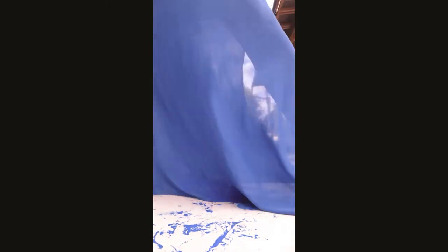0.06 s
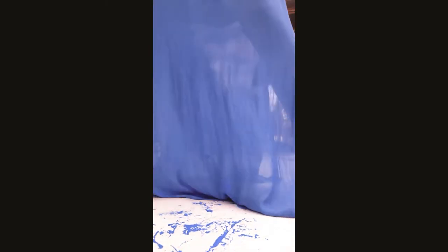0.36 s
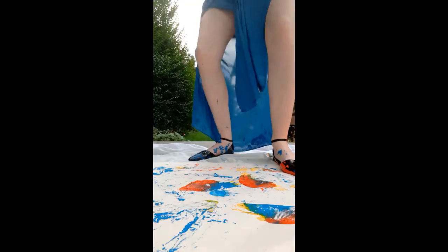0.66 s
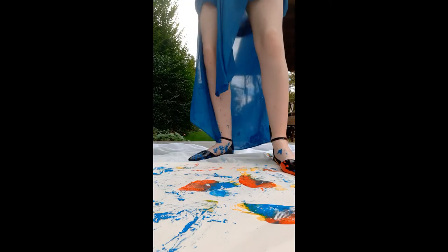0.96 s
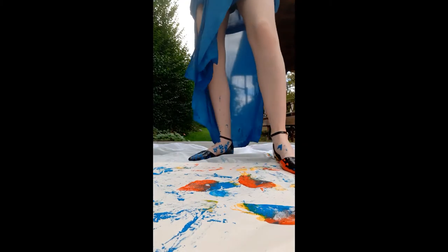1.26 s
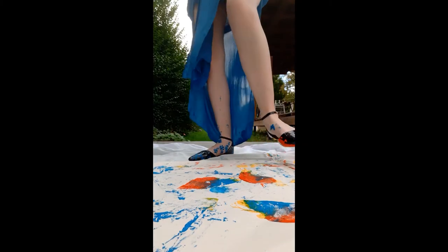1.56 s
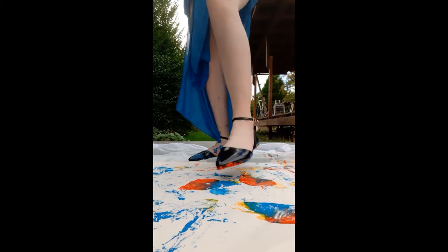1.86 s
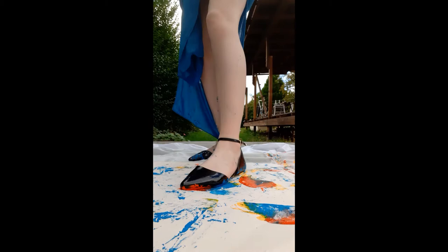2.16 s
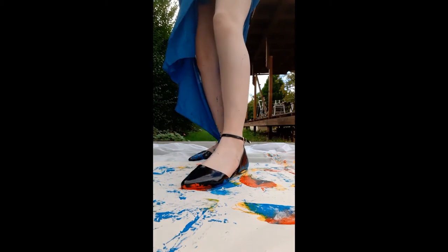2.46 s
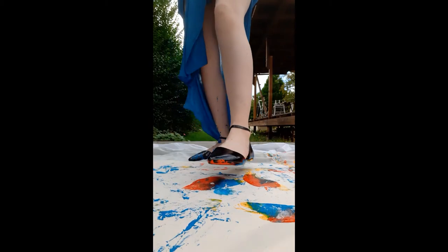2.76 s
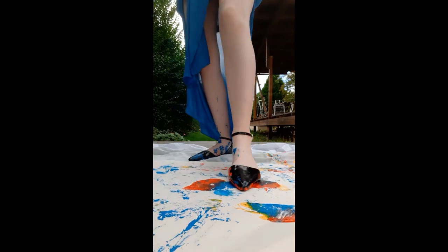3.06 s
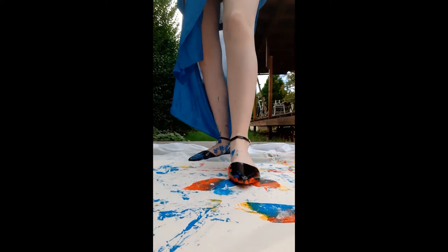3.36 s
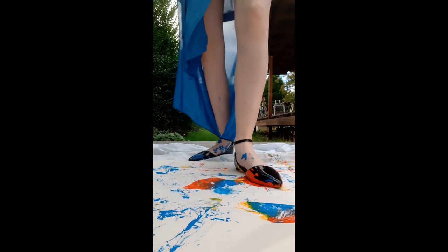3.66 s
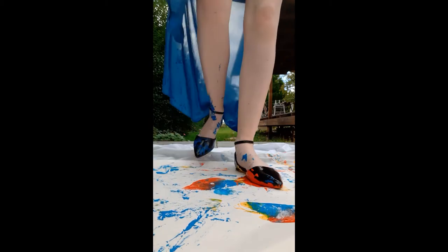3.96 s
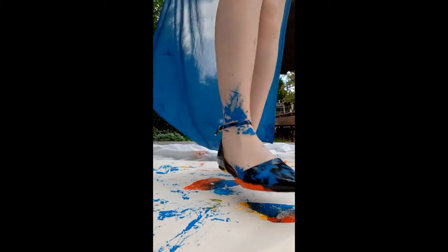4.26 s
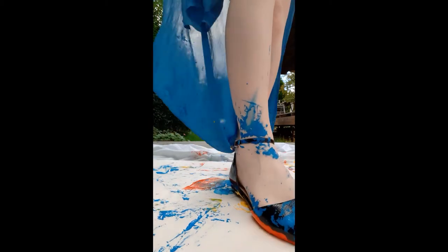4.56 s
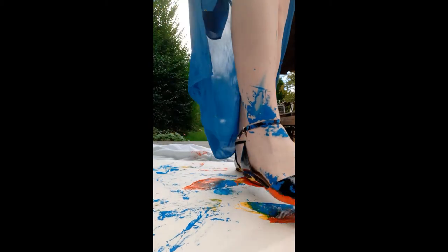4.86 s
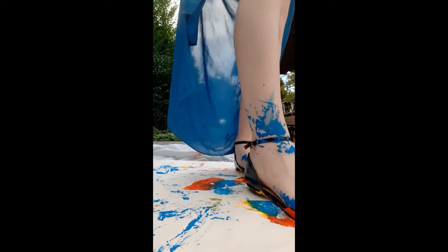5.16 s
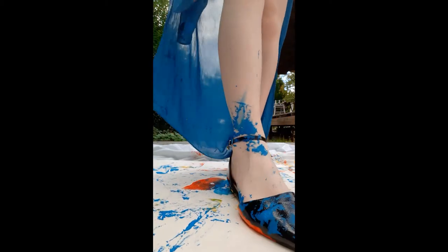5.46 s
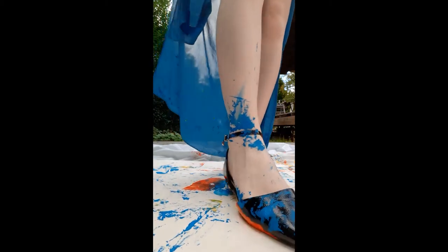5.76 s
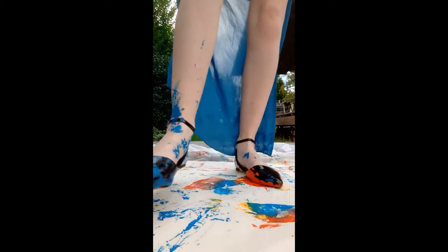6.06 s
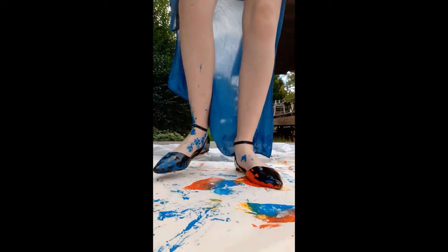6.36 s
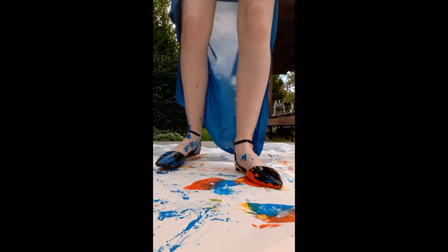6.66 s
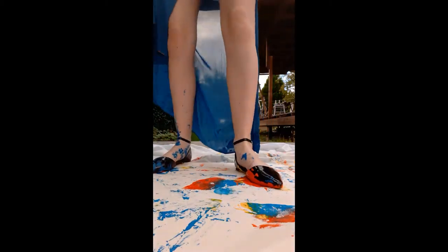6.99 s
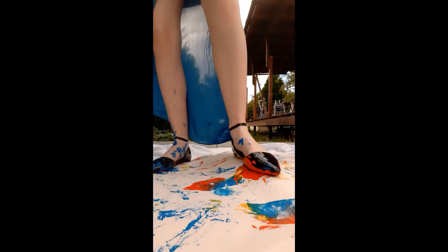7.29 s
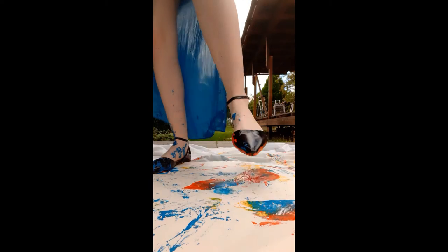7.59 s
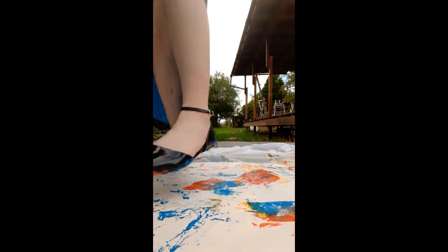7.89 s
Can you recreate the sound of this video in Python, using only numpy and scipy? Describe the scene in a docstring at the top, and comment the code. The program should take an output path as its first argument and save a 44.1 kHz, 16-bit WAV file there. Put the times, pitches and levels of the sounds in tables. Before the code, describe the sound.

A long skirt swishes softly, then hard-soled shoes step unevenly on a big sheet of paper laid on the ground in a garden. Heels and toes knock, the paper crunches and rustles, and shifting weight gives low bumps. The steps grow louder past the middle, with sharp heel clacks and a sticky peel of wet paint, ease off, then return in a last cluster. The microphone is close, with faint traffic far behind.

```python
"""A garden by a wooden porch: hard-soled shoes step through wet paint on a big paper sheet, close by.
Heels and toes knock and ring, soles crush the paper and peel off it, paint pops and creases snap.
The sheet and a long skirt rustle by friction; weight on the ground gives deep bumps.
The porch echoes faintly. Far traffic rumbles underneath, with a few thin, distant whistles."""
import sys
import numpy as np
from scipy import signal
from scipy.fft import rfft, irfft
from scipy.io import wavfile
from scipy.ndimage import uniform_filter1d, map_coordinates

SR = 44100
rng = np.random.default_rng(int(sys.argv[2]) if len(sys.argv) > 2 else 0)


def wav_record(signal):
    """Record a signal, one row per channel, as 16-bit PCM in the file named by sys.argv[1]."""
    frames = np.transpose(np.atleast_2d(signal))
    bounded = np.clip(frames, -1, 1)
    # unit amplitude maps onto the largest positive 16-bit level
    quanta = np.round(bounded * 32767).astype(np.int16)
    wavfile.write(sys.argv[1], SR, quanta)


N = 354123
TIME_S = np.arange(N) / SR

# microphone hiss spectrum: f/Hz, relative density/dB
MIC_SPECTRUM = [(2000, 3), (5000, 1), (8500, -9), (12000, 2), (16000, -4)]
# traffic spectrum: f/Hz, relative density/dB
TRAFFIC_SPECTRUM = [(20, -32), (39, -16.5), (62, -12), (85, -2.5), (102, -2.5), (150, -5.5), (210, -9),
                    (295, -8.5), (420, -17), (580, -22), (800, -20.5), (1400, -26), (2200, -36.5),
                    (3500, -55), (8000, -63.5)]
# traffic envelope: t/s, gain/dB
TRAFFIC_GAIN = [(0, -55), (.58, -55), (.605, -48.5), (1.2, -46), (3.4, -48), (5.9, -48.5), (6.6, -50),
                (8.03, -49)]
# distant whistles: t/s, length/s, f/Hz, bandwidth/Hz, level/dB
FAR_WHISTLES = [(4.31, 0.11, 7000, 1100, -67), (4.349, 0.065, 4970, 1200, -63),
                (4.47, 0.086, 7400, 700, -73), (4.478, 0.14, 6350, 600, -74), (6.1, 0.98, 1467, 90, -72),
                (7.52, 0.25, 2680, 205.6, -76)]
# coarse friction spectrum: f/Hz, relative density/dB
RASP_SPECTRUM = [(200, -8), (700, 7.5), (1600, 4), (2800, 3.5), (4500, 1.5), (7000, 0), (10000, -29),
                 (16000, -38.5)]
# fine friction spectrum: f/Hz, relative density/dB
HISS_SPECTRUM = [(3000, -5.5), (6000, -9), (8500, -5), (12000, -2), (16000, -4)]
# foot dragging the paper: t/s, rise/s, t60/s, rasp/dB, hiss/dB
DRAGS = [(1.267, 0.033, 0.3, -55, -59), (1.361, 0.087, 0.49, -51.5, -53), (2.482, 0.074, .21, -40, -42),
         (3.15, 0.025, 0.44, -61, -65), (3.41, 0.063, .7, -69, -63), (3.535, 0.019, 0.56, -55.5, -68),
         (3.63, 0.035, 1.6, -64, -70), (4.705, 0.053, 0.22, -59, -55), (5.265, 0.06, 0.17, -51.5, -53),
         (5.765, 0.052, 0.11, -49.5, -44.5), (5.92, .05, 0.23, -67.5, -90), (6.1, .013, 0.38, -69.5, -88),
         (6.48, .052, .79, -84, -71), (6.838, 0.013, 0.35, -58.5, -63), (7.089, .13, 0.55, -57, -61),
         (7.24, 0.18, .42, -51, -48.5)]
# loudest creases snapping: t/s, level/dB
CREASE_SNAPS = [(1.267, -45.5), (1.285, -43.5), (1.404, -41), (1.462, -39), (2.5648, -33), (2.587, -33.5),
                (2.6, -31.5), (2.634, -41), (3.0745, -33), (3.403, -44), (3.414, -46), (3.49, -55),
                (3.675, -53), (4.405, -39), (4.7832, -43), (7.154, -52), (7.178, -49)]
# weight shifting onto a foot: t/s, rise/s, t60/s, level/dB
WEIGHT_SHIFTS = [(1.961, 0.087, 0.65, -27.5), (2.18, 0.013, 0.18, -33.5), (2.96, 0.044, 0.22, -35),
                 (3.78, 0.02, 0.46, -39.5)]
# tacky sole peeling: t/s, length/s, start f/Hz, end f/Hz, level/dB
SOLE_PEELS = [(5.0452, 0.00563, 4480, 950, -21), (7.369, .014, 2726, 890, -21.5)]
# wet paint popping under a sole: t/s, length/s, level/dB
PAINT_PATCHES = [(1.4, .14, -41), (6.87, .035, -48.5), (7.183, 0.035, -39.5), (7.306, .037, -38)]
# shoe resonances on the covered ground: f/Hz, bandwidth/Hz, gain/dB
SHOE_MODES = [(665, 470, 2), (1264, 87, -17), (1610, 150, -12), (1890, 110, -9), (2490, 280, -10),
              (2760, 180, -18)]
# sole pressing or leaving the paper: t/s, rise/s, t60/s, thud/dB, crunch/dB, rasp/dB
SOLE_PRESSES = [(1.378, 0.018, 0.64, -40.5, -43.5, -51.5), (2.0, 0.067, 0.16, -37, -51.5, -62.5),
                (2.057, 0.0091, .7, -39, -49.5, -59.5), (2.495, 0.054, 0.32, -38.5, -50, -46.5),
                (3.068, 0.0025, 0.15, -30, -44, -55.5), (3.927, 0.02, 0.17, -46, -46.5, -45),
                (4.406, 0.023, 0.1, -25, -26, -34), (4.801, 0.019, 0.1, -33, -33, -60),
                (5.034, 0.026, .07, -23.5, -28, -34), (5.07, .013, 0.092, -34.5, -29.5, -43),
                (5.4529, 0.0027, 0.074, -32, -22.5, -40.5), (5.459, 0.011, 0.071, -25.5, -22, -29.5),
                (5.625, 0.02, 0.3, -43, -47, -63), (5.81, .042, .13, -35.5, -39, -65),
                (6.875, .012, 0.19, -45, -54, -65), (7.275, 0.041, 0.28, -40.5, -41.5, -60),
                (7.362, 0.0097, .13, -33.5, -26.5, -38), (7.39, 0.019, 0.18, -37, -35.5, -58)]
# thud, crunch, rasp and hiss bands of a press: low f/Hz, high f/Hz
SOLE_BANDS = [(125, 378), (480, 2200), (2400, 5960), (7000, 16400)]
# heel tip resonances: f/Hz, t60/s, relative level/dB
HEEL_MODES = [(1373, 0.024, -1), (2313, 0.044, 2), (2450, 0.026, -18), (3560, 0.012, 5), (4070, 0.014, -1)]
# heel tip strikes: t/s, level/dB
HEEL_STRIKES = [(2.059, -55), (3.0742, -61), (3.9313, -32.5), (4.795, -27.5), (5.046, -29), (5.778, -57),
                (7.3648, -29)]
# shoe knocks: t/s, level/dB, f/Hz, bright edge re level/dB
KNOCKS = [(1.282, -42.5, 1440, -6.5), (1.373, -39.5, 790, -30), (1.402, -31, 1200, -5.5),
          (1.461, -33.5, 810, -5), (1.592, -43.5, 930, -30), (2.058, -29, 1010, -17.5),
          (2.6343, -35, 1450, -8), (3.074, -28.5, 726, -27), (3.93, -29, 1730, -2), (4.429, -31, 1300, 1),
          (4.435, -30, 1100, -24), (4.76, -30.5, 950, -23), (4.795, -21.5, 1950, -50),
          (5.06, -12, 660, -46), (5.066, -26.5, 800, -23), (5.343, -41, 910, -32), (5.453, -30, 1360, -20),
          (5.468, -23.5, 1060, -33), (5.638, -40, 1340, -44), (5.777, -31.5, 1200, -28),
          (5.8377, -29.5, 1060, -25), (5.849, -34, 1010, -32), (5.885, -35.5, 1280, -30),
          (6.229, -48.5, 855, -32), (6.841, -47.5, 1250, -14), (7.178, -40, 1910, -22),
          (7.291, -33, 1450, -15), (7.3646, -23.5, 2600, -37), (7.4061, -26.5, 825, -22),
          (7.441, -37.5, 1620, -24), (7.998, -41.5, 940, -36)]
# feet's bearing to the right: t/s, left channel lag/samples
LEFT_LAG = [(1.4, 3), (4.6, 4), (5.5, 6), (6.8, 2.3)]
# brief dip in overall level: t/s, gain/dB
LEVEL_DIP = [(.555, 1.5), (.575, -18), (.592, -29), (.606, 0)]


def undb(db):
    """Decibels to gain."""
    return 10 ** (np.asarray(db) / 20)


def unit(x):
    """Scale to rms 1."""
    return x / np.sqrt(np.mean(x ** 2))


def unit_hit(x):
    """Scale to the energy of 5 ms at rms 1."""
    return x * np.sqrt(.005 * SR / np.sum(x ** 2))


def curve(points):
    """Interpolate (t/s, value) rows over the scene."""
    return np.interp(TIME_S, *np.transpose(points))


def fade(t, t60_s):
    """Exponential decay."""
    return np.exp(-np.log(1000) * t / t60_s)


def swell(t, rise_s, t60_s, start_db):
    """Rise from start_db to full level, then decay."""
    attack = undb(start_db * np.maximum(1 - t / rise_s, 0))
    return attack * fade(np.maximum(t - rise_s, 0), t60_s)


def band(x, lo_hz, hi_hz, order=2):
    """Causal band-pass."""
    return signal.sosfilt(signal.butter(order, [lo_hz, hi_hz], "band", fs=SR, output="sos"), x)


def colour(x, spectrum):
    """Shape by (f/Hz, gain/dB) rows, then scale to rms 1."""
    hz, db = np.transpose(spectrum)
    bins_hz = np.maximum(np.fft.rfftfreq(N, 1 / SR), 1)
    return unit(irfft(rfft(x) * undb(np.interp(np.log(bins_hz), np.log(hz), db)), N))


def grains(n, spread_db):
    """Dense micro-clicks, resized every 16 samples."""
    sizes = np.repeat(undb(spread_db * rng.standard_normal(n // 16 + 1)), 16)[:n]
    return unit(rng.standard_normal(n) * sizes)


def wander(rate_hz):
    """Smooth random drift, rms 1."""
    hold = int(SR / rate_hz)
    steps = np.repeat(rng.standard_normal(N // hold + 1), hold)
    return unit(uniform_filter1d(uniform_filter1d(steps, hold), hold)[:N])


def wide(mid, side, width):
    """Mid and side to stereo."""
    return (mid + width * side * np.array([[1], [-1]])) / np.sqrt(1 + width ** 2)


def pan(x, pan_db):
    """Set left re right level."""
    return x * undb([[pan_db / 2], [-pan_db / 2]])


def add(out, at_s, x, pan_db=0):
    """Mix x in at at_s."""
    i = int(at_s * SR)
    out[:, i:i + x.shape[-1]] += pan(x, pan_db)[:, :N - i]


def mic_hiss(level_db=-78):
    """Each microphone port adds its own hiss."""
    return undb(level_db) * np.array([colour(rng.standard_normal(N), MIC_SPECTRUM) for _ in range(2)])


def traffic(drone_hz=101, drone_db=-12):
    """Far traffic: a dull, restless rumble with a narrow drone."""
    mid, side = (colour(rng.standard_normal(N), TRAFFIC_SPECTRUM) * undb(wander(14)) for _ in range(2))
    drone = undb(drone_db) * unit(band(rng.standard_normal(N), drone_hz - 9, drone_hz + 9))
    return undb(curve(TRAFFIC_GAIN)) * pan(wide(mid + drone, side, width=.25), pan_db=-2.06)


def whistles():
    """Narrow, airy tones come and go."""
    out = np.zeros((2, N))
    for at_s, length_s, hz, width_hz, db in FAR_WHISTLES:
        n = int(length_s * SR)
        tone = band(rng.standard_normal((2, n)), hz - width_hz / 2, hz + width_hz / 2)
        add(out, at_s, undb(db) * unit(np.hanning(n) * tone))
    return out


def porch(x, build_s=.0032, main_t60_s=.25, bass_t60_s=.18):
    """Scattered reflections off porch and trees."""
    t = np.arange(int(.7 * SR)) / SR
    scatter = rng.standard_normal((2, len(t))) * (1 - np.exp(-t / build_s))
    decay = fade(t, main_t60_s)
    main = undb(-15.5) * band(scatter, 350, 6000, order=1) * decay
    bass = undb(-18) * band(scatter, 60, 540) * fade(t, bass_t60_s)
    return 1.22 * signal.fftconvolve(x, (main + bass) / np.linalg.norm(decay), axes=1)[:, :N]


def friction(rasp_gain, hiss_gain, spread_db, flutter_db):
    """Surfaces catch and let go: coarse rasp under bright hiss."""
    layers = []
    for spectrum in (RASP_SPECTRUM, HISS_SPECTRUM):
        mid, side = (colour(grains(N, spread_db), spectrum) for _ in range(2))
        layers.append(wide(mid, side, width=.93))
    rasp, hiss = layers
    return undb(flutter_db * wander(90)) * (1.05 * rasp_gain * rasp + hiss_gain * hiss)


def skirt(gain_db=-56.5, slow_at_s=.13, stop_at_s=.38, swish_hz=2300, width_hz=900, swish_db=-5):
    """Cloth slides evenly with a soft resonance, slows, then stops."""
    slowing = fade(np.maximum(TIME_S - slow_at_s, 0), t60_s=1.78)
    stopping = fade(np.clip(TIME_S - stop_at_s, 0, 1), t60_s=.39)
    slide = undb(gain_db) * slowing * stopping
    swish = unit(band(rng.standard_normal((2, N)), swish_hz - width_hz / 2, swish_hz + width_hz / 2))
    return friction(slide, slide, spread_db=0, flutter_db=.6) + undb(swish_db) * slide * swish


def crinkles(rate_hz=80, spread_db=5, t60_s=.0074):
    """Small creases give way at random moments."""
    clicks = (rng.random(N) < rate_hz / SR) * undb(spread_db * np.minimum(rng.standard_normal(N), 2))
    decay = fade(np.arange(SR // 100) / SR, t60_s)
    return signal.fftconvolve(clicks, decay)[:N] * rng.standard_normal(N)


def paper_rustle(trim_db=-1, crinkle_db=-5, settle_rise_s=.022, settle_t60_s=.33, settle_db_per_db=.47):
    """The sheet rubs and crinkles when dragged, and as it settles after each press."""
    gains, t = np.zeros((2, N)), np.arange(SR // 2) / SR
    settling = []
    for at_s, rise_s, _, _, crunch_db, _ in SOLE_PRESSES:
        follow_db = settle_db_per_db * crunch_db
        settling.append((at_s + rise_s, settle_rise_s, settle_t60_s, follow_db - 49.5, follow_db - 52.5))
    for at_s, rise_s, t60_s, rasp_db, hiss_db in DRAGS + settling:
        add(gains, at_s, undb([[rasp_db], [hiss_db]]) * swell(t, rise_s, t60_s, start_db=-18))
    rasp_gain, hiss_gain = undb(trim_db) * gains
    creases = crinkles()
    crinkling = rasp_gain * colour(creases, RASP_SPECTRUM) + hiss_gain * colour(creases, HISS_SPECTRUM)
    return friction(rasp_gain, hiss_gain, spread_db=3, flutter_db=.1) + undb(crinkle_db) * crinkling


def crease_snaps(grit=.28, t60_s=.0087):
    """A crease gives way with a tiny, bright crack."""
    out, t = np.zeros((2, N)), np.arange(SR // 30) / SR
    for at_s, db in CREASE_SNAPS:
        crack = (t == 0) + grit * rng.standard_normal((2, len(t))) * fade(t, t60_s)
        treble = band(crack, 9500, SR / 2 - 1000, order=1)
        add(out, at_s, undb(db) * np.sqrt(2) * unit_hit(treble), pan_db=-.5)
    return out


def ground_bumps(deep_hz=(68, 150), body_hz=(180, 340), body_db=-8, press_t60_s=.26, re_thud_db=-5.5):
    """The ground answers each weight shift and press with a few deep cycles and a dull body."""
    out, t = np.zeros((2, N)), np.arange(SR // 2) / SR
    landings = [(at_s, rise_s, press_t60_s, thud_db + re_thud_db)
                for at_s, rise_s, _, thud_db, _, _ in SOLE_PRESSES]
    for at_s, rise_s, t60_s, db in WEIGHT_SHIFTS + landings:
        rumble = signal.hilbert(band(rng.standard_normal((2, SR)), *deep_hz, order=3))[:, -len(t):]
        ring = unit(rumble.real / np.sqrt(np.abs(rumble)))  # flatter envelope: more ring than noise
        body = undb(body_db) * unit(band(rng.standard_normal((2, len(t))), *body_hz))
        load = swell(t, rise_s, t60_s, start_db=-14)
        add(out, at_s, undb(db) * load * wide(*(ring + body), width=.19), pan_db=-.5)
    return band(out, 48, 610, order=3)


def sole_peels(roughness=.63):
    """The air gap under a tacky sole rings lower as it opens."""
    out = np.zeros((2, N))
    for at_s, length_s, start_hz, end_hz, db in SOLE_PEELS:
        opening = np.linspace(0, 1, int(length_s * SR))
        phase = 2 * np.pi * np.cumsum(start_hz * (end_hz / start_hz) ** opening) / SR
        tearing = 1 + roughness * unit(band(rng.standard_normal(len(opening)), 100, 980))
        arch = np.sqrt(opening * (1 - opening))
        add(out, at_s, undb(db) * unit(np.sin(phase) * tearing * arch))
    return out


def paint_pops(count=4, centre_hz=1200, spread_oct=.25, spread_db=2, edge_db=-20):
    """Tacky paint lets go in uneven pops; returns rows like KNOCKS."""
    rows = []
    for start_s, length_s, db in PAINT_PATCHES:
        times_s = start_s + length_s * (np.arange(count) + rng.random(count)) / count
        for at_s, (size, pitch) in zip(times_s, rng.standard_normal((count, 2))):
            rows.append((at_s, db + spread_db * size, centre_hz * 2 ** (spread_oct * pitch), edge_db))
    return rows


def shoe_ring(contact, amount):
    """Contact sound plus the sole's short ring."""
    ring = sum(undb(db) * band(contact, hz - width_hz / 2, hz + width_hz / 2, order=1)
               for hz, width_hz, db in SHOE_MODES)
    return contact + amount * ring


def sole_presses(crisp_rise_s=.008, hiss_db_per_doubling=-4.5, thud_trim_db=-1):
    """Paper crackles as the sole rolls down; quicker is brighter, and the treble dies first."""
    out, t = np.zeros((2, N)), np.arange(SR // 3) / SR
    widths, pans_db, t60_ratios = (.35, .45, .75, .75), (-4.5, -1.5, 0, -1), (1.2, 1, .85, .7)
    for at_s, rise_s, t60_s, thud_db, crunch_db, rasp_db in SOLE_PRESSES:
        hiss_db = rasp_db + hiss_db_per_doubling * np.log2(rise_s / crisp_rise_s)
        levels_db = thud_db + thud_trim_db, crunch_db, rasp_db, hiss_db
        for k, edges_hz in enumerate(SOLE_BANDS):
            load = swell(t, rise_s, t60_s * t60_ratios[k], start_db=-9)
            crackles = [band(grains(len(t), spread_db=4), *edges_hz, order=3) for _ in range(2)]
            mid, side = (unit(shoe_ring(crackle, amount=.5)) for crackle in crackles)
            add(out, at_s, undb(levels_db[k]) * load * wide(mid, side, widths[k]), pans_db[k])
    return out


def heel_clacks(detune=.029):
    """The struck heel tip rings briefly, retuned each time."""
    out, t = np.zeros((2, N)), np.arange(SR // 16) / SR
    for at_s, db in HEEL_STRIKES:
        tuning = 1 + detune * rng.standard_normal()
        ring = sum(undb(mode_db) * fade(t, t60_s) * np.sin(2 * np.pi * hz * tuning * t)
                   for hz, t60_s, mode_db in HEEL_MODES)
        add(out, at_s, undb(db) * unit_hit(ring), pan_db=-1)
    return out


def knocks(hits, lead_s=.004, lead_in_gain=.027, grit=.12, band_ratio=1.65, body_db=.5, thump_db=-10):
    """A faint gritty lead-in softens each knock's attack; grit crumbles after it."""
    out = np.zeros((2, N))
    t = (np.arange(SR // 8) - int(lead_s * SR)) / SR
    ref_t60_s, ref_db, halving_db = .024, -28.5, 9.5
    for at_s, db, hz, edge_db in hits:
        t60_s = ref_t60_s * 2 ** ((ref_db - db) / halving_db)  # a firm knock seats sooner
        grit_gain = np.where(t < 0, lead_in_gain * (1 + t / lead_s), grit * fade(np.abs(t), t60_s))
        texture = wide(grains(len(t), spread_db=4.5), grains(len(t), spread_db=3), width=.56)
        push = (t == 0) + grit_gain * texture
        contact = band(push, hz / band_ratio, hz * band_ratio)
        body = undb(body_db) * unit_hit(shoe_ring(contact, amount=.93))
        edge = undb(edge_db) * unit_hit(band(push, 2200, 5900))
        thump = undb(thump_db) * unit_hit(band(push, 130, 367))
        add(out, at_s - lead_s, np.sqrt(2) * undb(db) * (body + edge + thump), pan_db=-2.3)
    return out


def scene():
    """Feet, echo and background; the feet are on the right, so the left channel lags."""
    impacts = knocks(KNOCKS + paint_pops()) + heel_clacks() + crease_snaps()
    left, right = impacts + sole_presses() + ground_bumps() + sole_peels() + paper_rustle()
    late_left = map_coordinates(left, [np.arange(N) - curve(LEFT_LAG)], order=5)
    feet = np.array([late_left, right])
    return feet + porch(feet) + skirt() + whistles() + traffic() + mic_hiss()


def record(dry):
    """One brief level dip, then a steep 16 kHz low-pass."""
    lowpass = signal.ellip(10, .2, 70, 16000, fs=SR, output="sos")
    return signal.sosfilt(lowpass, dry * undb(curve(LEVEL_DIP)))


dry = scene()
out = record(dry)
wav_record(out)
```